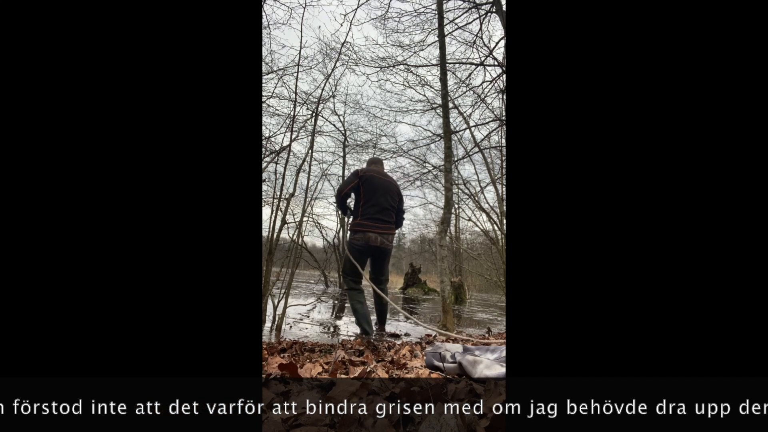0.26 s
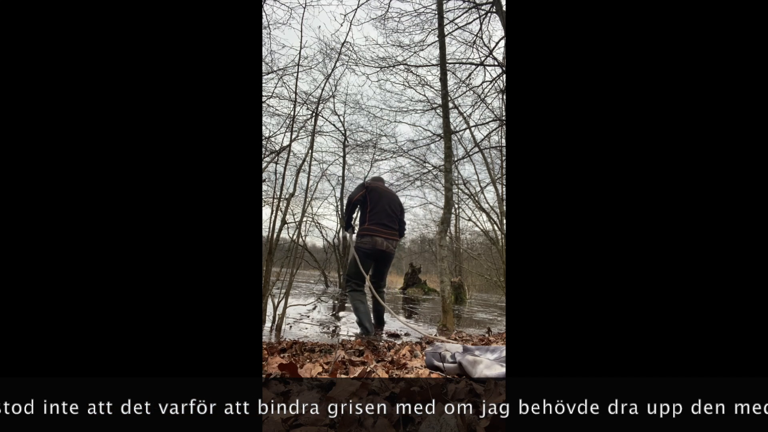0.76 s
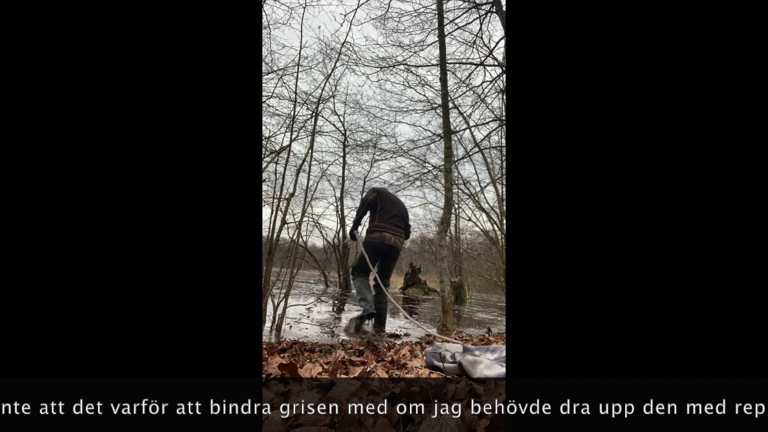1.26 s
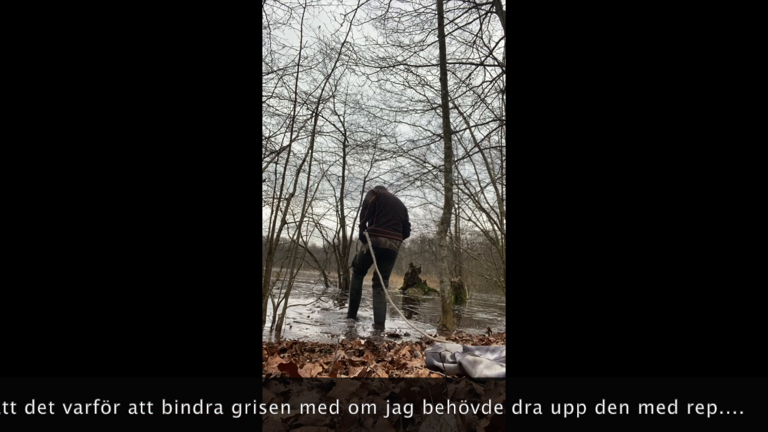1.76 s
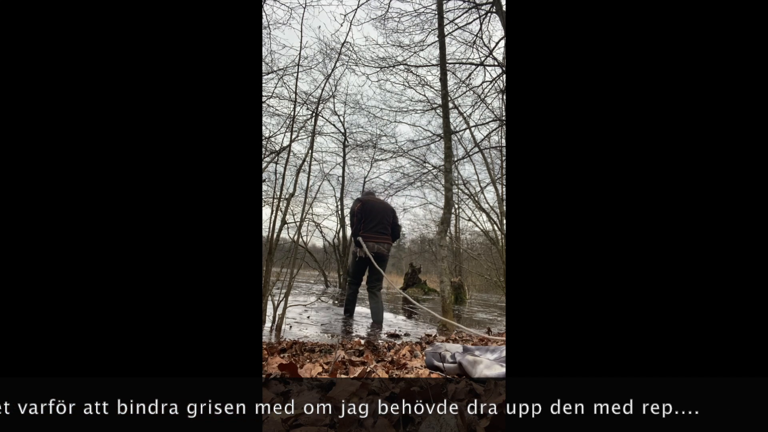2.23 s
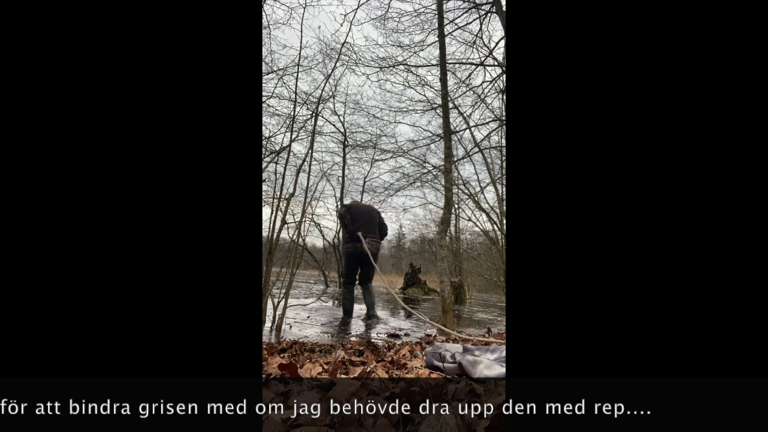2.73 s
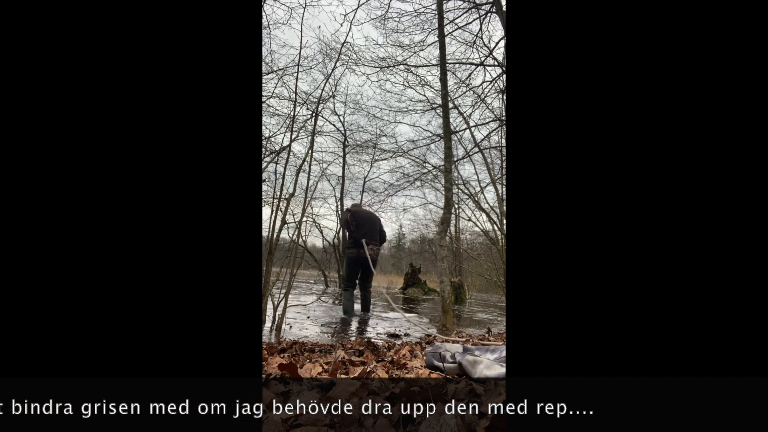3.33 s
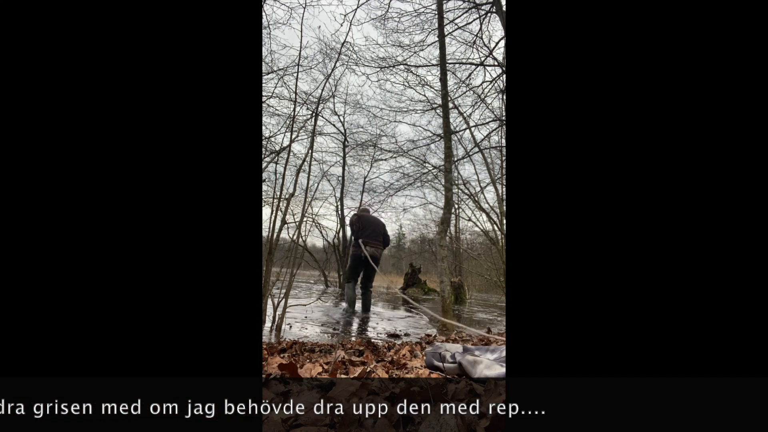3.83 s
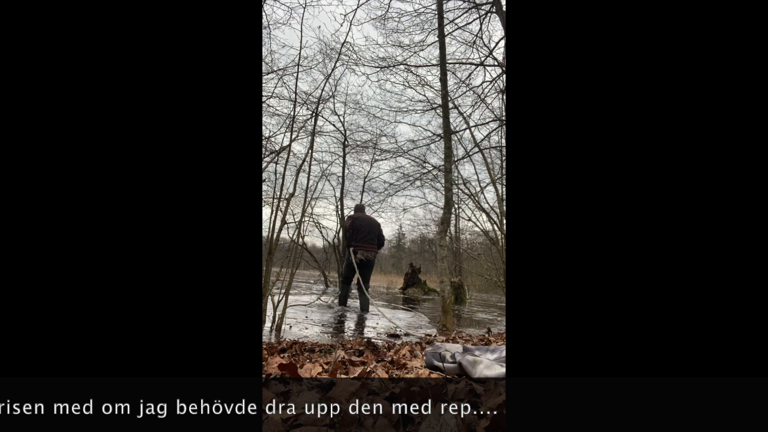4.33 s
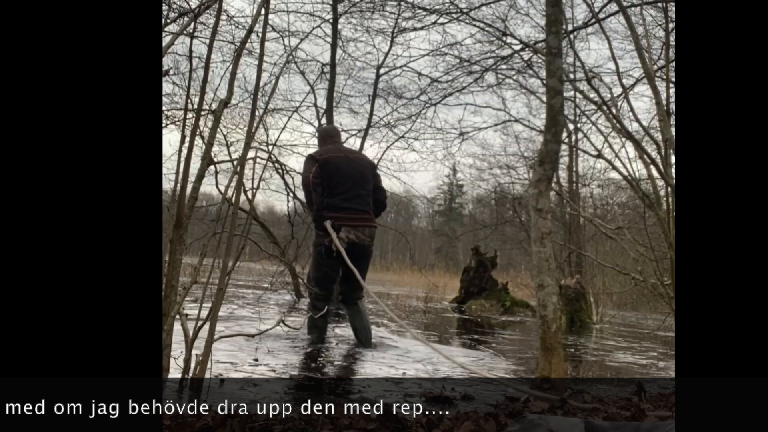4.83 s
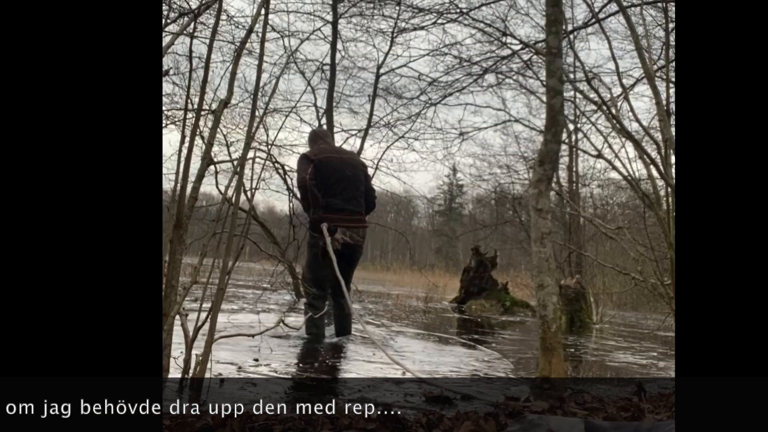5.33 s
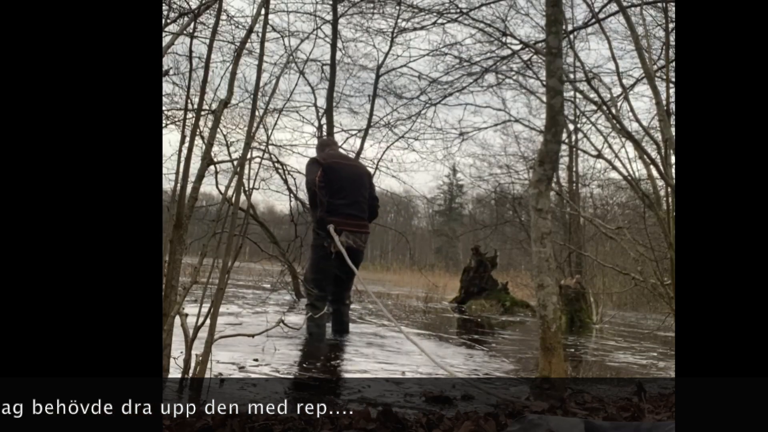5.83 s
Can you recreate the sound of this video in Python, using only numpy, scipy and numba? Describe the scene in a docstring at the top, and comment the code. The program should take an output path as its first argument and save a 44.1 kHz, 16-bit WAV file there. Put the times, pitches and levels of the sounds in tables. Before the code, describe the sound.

Someone wades into a shallow woodland pool, close to the microphone at first. In the first second there are a few small splashes and soft brushes of dry leaves, and a small bird gives two faint, thin, high whistles. From about 1.3 seconds the legs push hard through the water: sharp splashes, round gurgling bubbles, low boot thumps and drops falling back, loudest between 1.4 and 1.8 seconds. After a short lull the bird calls once more at about 2.4 seconds, and a second surge of splashing follows around 2.7 to 3 seconds. The wader then moves away, with softer sloshing steps at about 4 to 4.5 seconds and again from 5 seconds, thinning to light splashes and drips by 6 seconds. Far traffic rumbles quietly throughout with a low, wavering hum, and the trees add only a very short echo.

```python
"""Dry leaves rustle and a small bird whistles twice as someone steps into a shallow woodland pool.
From 1.3 s the legs push hard: trapped air rings as bubbles, boots thump, sheets of water break into
spray and drops fall back. The bird calls again at 2.4 s, just before a second surge, and then the
splashes soften as the wader moves away. Far traffic rumbles throughout with a low, wavering hum."""
import sys
import numpy as np
from scipy import signal
from scipy.fft import rfft, irfft, next_fast_len
from scipy.io import wavfile
from scipy.ndimage import uniform_filter1d
from numba import njit

SR = 44100
rng = np.random.default_rng(int(sys.argv[2]) if len(sys.argv) > 2 else 0)


def pcm_store(signal):
    """Save signal as 16-bit PCM."""
    levels = np.round(np.clip(np.atleast_2d(signal), -1, 1) * 32767)
    wavfile.write(sys.argv[1], SR, levels.astype(np.int16).T)


N = 268567


def undb(db):
    return 10 ** (np.asarray(db) / 20)


def unit_rms(x):
    return x / np.sqrt(np.mean(x ** 2))


def over_time(table):
    """Columns of an envelope table at every sample."""
    times, *columns = np.transpose(table)
    return [np.interp(np.arange(N) / SR, times, column) for column in columns]


def over_pitch(points, size):
    """Values of (Hz, value) points at the bins of an FFT."""
    hz, value = np.transpose(points)
    return np.interp(np.log(np.arange(size // 2 + 1) * SR / size + 20), np.log(hz + 20), value)


def colour(x, eq):
    """Filter by a (Hz, dB) curve."""
    size = next_fast_len(x.shape[-1])
    return irfft(rfft(x, size) * undb(over_pitch(eq, size)), size)[..., :x.shape[-1]]


def noise(eq):
    return unit_rms(colour(rng.standard_normal(N), eq))


def wander(rate_hz):
    """Smooth random modulation with a spread near 1."""
    hold = int(SR / rate_hz)
    steps = np.repeat(rng.standard_normal(N // hold + 1), hold)
    return 1.3 * uniform_filter1d(uniform_filter1d(steps, hold), hold)[:N]


@njit
def bubbles(length, start, hz, t60, rise, size, swell_cycles):
    """Damped sines whose pitch rises as they fade, as bubbles near a surface do."""
    out = np.zeros(length)
    for k in range(len(start)):
        n = int(t60[k] * SR) + 2
        decay, step = np.exp(-6.9 / n), 2 * np.pi * hz[k] / SR
        gain, phase = size[k], 0.
        for i in range(min(n, length - start[k])):
            phase += step * (1 + rise * i / n)
            gain *= decay
            attack = 1 - np.exp(-phase / (2 * np.pi * swell_cycles))
            out[start[k] + i] += gain * np.sin(phase) * attack
    return out


def clusters(events, count, stagger, ring, cycles, rise, swell_cycles, neighbours=1):
    """A lead bubble and its neighbours per event; stagger and ring scale its length, cycles caps ring."""
    out, span = np.zeros(N), int(.25 * SR)
    for start_s, db, hz, length_s, octaves, attack_s in events:
        lag, detune = rng.gamma(1.5, size=count), rng.standard_normal(count)
        lag[0] = detune[0] = 0
        starts = np.clip(lag * stagger * length_s * SR, 0, span - 1).astype(int)
        pitches = np.clip(hz * 2 ** (octaves * detune), 90, 15500)
        t60 = np.minimum(cycles / pitches, ring * length_s)
        sizes = np.exp(-.45 * lag) * np.where(lag > 0, neighbours, 1)
        cluster = bubbles(span, starts, pitches, t60, rise, sizes, swell_cycles)
        cluster *= 1 - np.exp(-np.arange(span) / SR / attack_s)
        i = int(start_s * SR)
        out[i:i + span] += (cluster * undb(db) / np.abs(cluster).max())[:N - i]
    return out


def swarm(count, lo_hz, hi_hz, cycles, scatter_db):
    """Bubbles at random moments and pitches; a few are much louder than the rest."""
    when, pitch, luck, life = rng.random((count, 4)).T
    hz = lo_hz * (hi_hz / lo_hz) ** pitch
    sizes = undb(np.minimum(-scatter_db * np.log(1 - luck), 4 * scatter_db))
    t60 = cycles * (.5 + life) / hz
    return unit_rms(bubbles(N, (when * N).astype(int), hz, t60, rise=0.23, size=sizes, swell_cycles=2.2))


def churn(lo_hz, hi_hz, flicker_db, rate_hz):
    """Turbulent hiss in third octaves, each flickering partly on its own."""
    out, shared = 0, wander(rate_hz)
    for hz in lo_hz * 2 ** np.arange(0, np.log2(hi_hz / lo_hz), 1 / 3):
        band_eq = [(hz * .75, -40), (hz * .89, 0), (hz * 1.12, 0), (hz * 1.33, -40)]
        band = colour(rng.standard_normal(N), band_eq)
        out = out + band * undb(flicker_db * (1.61 * shared + 0.51 * wander(rate_hz)))
    return unit_rms(out)


# The push of the legs. Each row: time in seconds, then slosh, wash and spray levels in dB.
LEG_PUSH = [(0.0, -76, -61, -65), (0.1, -68, -73, -68), (0.27, -86, -78, -70), (0.33, -86, -86, -75.5),
            (1.08, -79.5, -90, -74.5), (1.15, -63, -62, -61), (1.33, -52, -57.5, -51.5),
            (1.41, -54, -51, -52), (1.45, -39, -48, -53), (1.505, -45.5, -47.5, -48.5),
            (1.55, -44, -43.5, -49), (1.61, -49, -49, -51), (1.69, -47, -44.5, -50.5),
            (1.75, -52, -51, -47.5), (1.97, -57, -67, -59.5), (2.15, -58.5, -61, -59),
            (2.3, -65.5, -74.5, -58.5), (2.6, -59, -66, -59), (2.7, -57.5, -62, -54),
            (2.92, -49, -52, -48.5), (3.36, -57, -63.5, -60.5), (3.5, -71, -75.5, -62),
            (3.86, -61.5, -70, -59.5), (4.12, -58.5, -58, -56), (4.42, -59, -62, -58),
            (4.5, -51, -60, -58.5), (4.68, -68.5, -69, -64.5), (4.9, -64.5, -68.5, -59),
            (5.0, -67, -70, -57.5), (5.03, -61.5, -66, -56.5), (5.2, -58.5, -61.5, -57.5),
            (5.55, -62.5, -67.5, -60.5), (5.72, -65.5, -71, -63.5), (5.95, -73, -74.5, -65),
            (6.09, -69, -86, -63)]
# The level of the 2.5-5 kHz fizz, swelling with each surge and sinking in the lulls.
# Each row: time in seconds, level in dB.
FIZZ_ENVELOPE = [(0.0, -69), (0.34, -81.5), (0.88, -86.5), (1.08, -80), (1.31, -57.5), (1.47, -65),
                 (1.59, -58.5), (1.68, -53), (1.9, -64), (2.27, -73), (2.56, -72), (2.68, -63), (2.81, -58),
                 (2.95, -57.5), (3.53, -70), (3.81, -69), (4.16, -60.5), (4.34, -62), (4.61, -68.5),
                 (4.92, -68), (5.26, -63), (6.09, -72)]
# The tone of the four water layers. Each row: frequency in Hz, gain in dB.
SLOSH_EQ = [(120, -5.5), (250, -6), (500, -1.5), (800, -8), (1300, -26.5)]
WASH_EQ = [(600, -36), (1000, -3), (1800, 1), (2600, -1.5), (4000, -7)]
SPRAY_EQ = [(3200, -12), (4300, -8.5), (5200, 0), (6000, 4), (7800, 1), (9500, -2), (12000, -5), (15500, 2)]
FIZZ_EQ = [(2200, 0.5), (2800, -8), (3400, -5), (4200, -2), (5000, 0), (6000, -32)]

def wading():
    """Legs stir up bubbles, from large in the slosh to tiny in the spray, each over a churning hiss."""
    slosh_db, wash_db, spray_db = over_time(LEG_PUSH)
    fizz_db, = over_time(FIZZ_ENVELOPE)
    slosh = swarm(count=2200, lo_hz=153.5, hi_hz=1095, cycles=13.5, scatter_db=2.5)
    slosh += churn(117.7, 1300, flicker_db=3.5, rate_hz=20)
    wash = swarm(count=2500, lo_hz=807, hi_hz=3506, cycles=28.5, scatter_db=3)
    wash += 0.9 * churn(609, 4000, flicker_db=2.5, rate_hz=25)
    spray = swarm(count=14000, lo_hz=4410, hi_hz=16030, cycles=52, scatter_db=5)
    spray += 1.3 * churn(3290, 16000, flicker_db=1.55, rate_hz=40)
    fizz = swarm(count=5000, lo_hz=2484, hi_hz=5440, cycles=34, scatter_db=4)
    fizz += 0.81 * churn(2340, 6000, flicker_db=1.4, rate_hz=32)
    layers = [(slosh, slosh_db, SLOSH_EQ), (wash, wash_db, WASH_EQ),
              (spray, spray_db, SPRAY_EQ), (fizz, fizz_db, FIZZ_EQ)]
    return sum(undb(db) * unit_rms(colour(layer, eq)) for layer, db, eq in layers)


# Low footfalls. Each row: start in seconds, level in dB, pitch in Hz.
BOOT_THUMPS = [(1.434, -33, 220), (1.686, -39, 267), (2.945, -43, 256), (4.299, -44, 262)]

def boots():
    """Boots hit the water and the soft bottom with a short, low ring."""
    length_s, octaves, attack_s = 0.0182, 0.16, 0.00026
    events = [(*row, length_s, octaves, attack_s) for row in BOOT_THUMPS]
    return clusters(events, count=4, stagger=0.374, ring=4.5, cycles=6.4, rise=0.089, swell_cycles=0.25)


# Round glugs. Each row: start in seconds, level in dB, pitch in Hz, ring time in seconds.
GLUGS = [(0.147, -55.5, 1200, 0.023), (0.018, -57, 575, 0.032), (0.64, -63.5, 600, 0.075),
         (0.7921, -60, 915, 0.031), (0.798, -53.5, 376, 0.074), (1.1425, -49.5, 336, 0.048),
         (1.188, -49, 530, .05), (1.205, -50, 370, 0.052), (1.251, -43.5, 947, 0.036),
         (1.2744, -38.5, 705, 0.042), (1.2756, -29, 446, .03), (1.3189, -44, 840, 0.027),
         (1.337, -40, 613, 0.066), (1.339, -40, 397, 0.066), (1.372, -42, 433, 0.04),
         (1.397, -47, 435, 0.045), (1.427, -28.5, 477, 0.029), (1.4297, -33, 770, .055),
         (1.437, -30.5, 502, 0.057), (1.468, -27, 541, 0.0472), (1.475, -36.5, 977, 0.039),
         (1.521, -35, 822, .05), (1.524, -34, 1063, .04), (1.548, -37.5, 896, 0.072),
         (1.575, -47.5, 634, 0.0766), (1.6774, -32, 914, 0.045), (1.678, -36, 630, 0.043),
         (1.679, -36, 415, 0.065), (1.725, -40.5, 1010, .06), (1.816, -47, 447, 0.047),
         (1.852, -40, 327, 0.033), (1.862, -47, 800, .07), (1.925, -51.5, 709, 0.0593),
         (2.612, -50.5, 570, .05), (2.6554, -51, 355, 0.062), (2.706, -52, 815, .09),
         (2.7397, -45, 356, 0.085), (2.798, -39, 583, 0.11), (2.834, -38, 323, 0.018),
         (2.871, -47, 610, .05), (2.975, -48, 644, 0.077), (3.101, -46, 363, .06), (3.3319, -44, 366, .06),
         (3.982, -50, 955, 0.033), (3.9867, -37.5, 443, 0.068), (4.0311, -50, 583, 0.037),
         (4.116, -50, 1030, 0.024), (4.1564, -47, 464, .05), (4.197, -44.5, 484, 0.047),
         (4.405, -40.5, 309, 0.04), (4.4459, -41, 418, 0.047), (4.8702, -46.5, 1180, 0.017),
         (5.0179, -52, 895, 0.014), (5.0281, -48.5, 306, .06), (5.028, -48.5, 663, 0.045),
         (5.205, -52, 690, 0.039), (5.118, -56, 1020, .03), (5.258, -52.5, 664, .06),
         (5.334, -43.5, 344, 0.045), (5.3606, -48, 390, 0.051), (5.678, -48, 1080, 0.016)]

def air_pockets():
    """Big pockets of trapped air ring as pairs of bubbles."""
    octaves, attack_share = 0.075, 0.073
    events = [(*row, octaves, attack_share * row[3]) for row in GLUGS]
    return clusters(events, count=2, stagger=0.12, ring=1, cycles=80, rise=0.097, swell_cycles=0.5,
                    neighbours=0.76)


# Small plinks. Each row: start in seconds, level in dB, pitch in Hz.
PLINKS = [(0.0196, -52, 1500), (0.065, -48.5, 1650), (0.154, -50, 1730), (0.26, -66, 1470),
          (0.565, -66, 1280), (0.652, -66, 1700), (1.117, -47, 2180), (1.3, -40.5, 1910),
          (1.4517, -34, 1770), (1.52, -31.5, 1323), (1.636, -32.5, 1660), (1.6793, -29.5, 1640),
          (1.816, -46.5, 1710), (1.897, -57, 2160), (2.106, -47, 1770), (2.786, -38.5, 1400),
          (2.836, -40.5, 1790), (2.872, -36.5, 1620), (2.934, -37.5, 1600), (3.193, -50, 1340),
          (3.929, -45.5, 2020), (4.053, -43.5, 1270), (4.236, -43.5, 1214), (4.292, -43, 1570),
          (4.398, -49, 1490), (4.537, -50, 1790), (5.047, -50.5, 1450), (5.0752, -49, 1880),
          (5.121, -47.5, 1320), (5.684, -49, 2280)]

def drops():
    """Drops fall back into the pool, each ringing a handful of small bubbles."""
    length_s, octaves, attack_s = 0.009, 0.25, 0.00026
    events = [(*row, length_s, octaves, attack_s) for row in PLINKS]
    return clusters(events, count=7, stagger=0.49, ring=3.7, cycles=28.6, rise=0.1, swell_cycles=0.12)


# Bright splash hits. Each row: start in seconds, level in dB, centre pitch in Hz, length in seconds,
# pitch spread in octaves, attack in seconds.
WATER_SLAPS = [(0.013, -37.5, 5800, 0.0049, 0.58, .0005), (0.148, -40, 6270, 0.007, 0.35, 0.00055),
               (0.219, -51.5, 4520, 0.003, 0.22, 0.00055), (0.259, -61, 4460, 0.0066, 0.2, .001),
               (0.404, -49.5, 6800, .005, 0.14, .0003), (0.466, -55, 6150, 0.0041, 0.16, .0005),
               (0.562, -57, 9100, .002, 0.31, 0.00044), (1.118, -43, 8600, 0.0043, 0.22, .0005),
               (1.128, -45, 6560, 0.0022, 0.15, 0.00046), (1.138, -37, 8550, 0.0017, 0.33, .0003),
               (1.185, -46, 5500, 0.0034, 0.45, .001), (1.288, -34.5, 8200, 0.0057, 0.33, 0.00042),
               (1.3163, -28.5, 8400, 0.0054, 0.22, .0003), (1.4255, -20.5, 6940, 0.0022, 0.65, 0.00018),
               (1.436, -28, 5630, 0.0046, 0.62, 0.0011), (1.451, -32, 3450, 0.0042, 0.068, 0.0014),
               (1.468, -34, 7860, 0.0033, 0.36, .0005), (1.496, -35, 4000, 0.0041, 0.47, .0005),
               (1.521, -27.5, 5030, 0.0039, 0.47, 0.00039), (1.57, -32, 7100, 0.0031, 0.83, .0005),
               (1.625, -29.5, 4970, 0.004, 0.11, 0.00033), (1.633, -26.5, 4400, 0.0084, 0.18, 0.0028),
               (1.6787, -15.5, 5530, 0.0059, 0.77, 0.00064), (1.7466, -31, 5000, 0.0087, 0.44, 0.00058),
               (1.802, -50, 6500, 0.0038, 0.22, .0005), (1.864, -35.5, 7400, 0.0037, 0.56, 0.00079),
               (1.9, -31.5, 3020, 0.0048, 0.27, 0.00037), (1.909, -29.5, 7260, 0.002, 0.35, 0.00024),
               (1.92, -34, 6300, 0.0029, 0.3, .0005), (1.977, -44, 4930, 0.0032, 0.11, .0005),
               (2.017, -60, 3680, 0.006, 0.096, .001), (2.055, -45, 7100, 0.0024, 0.16, 0.00054),
               (2.089, -41, 6600, 0.0053, 0.42, .001), (2.1772, -32, 6100, 0.0031, 0.17, 0.00022),
               (2.243, -56, 5860, 0.0042, .1, .001), (2.334, -42, 6200, 0.0072, 0.17, 0.0019),
               (2.36, -40.5, 5960, 0.0042, .08, 0.0011), (2.453, -40, 8000, 0.0025, 0.1, 0.0012),
               (2.557, -46, 5680, 0.0054, 0.074, .001), (2.611, -42.5, 7200, 0.0059, 0.45, .0005),
               (2.628, -52, 3760, 0.00094, 0.26, .0005), (2.6606, -39.5, 6540, 0.0067, 0.59, .0005),
               (2.756, -28.5, 6720, 0.011, 0.37, 0.0043), (2.83, -33.5, 5900, .012, 0.44, 0.0018),
               (2.873, -43, 4270, 0.0094, 0.33, .002), (2.88, -29, 6550, 0.0065, 0.32, 0.0012),
               (2.927, -23.5, 7000, 0.0096, 0.39, 0.0025), (2.985, -33, 6750, 0.008, 0.13, 0.00089),
               (3.2436, -35.5, 7340, 0.004, 0.65, .0005), (3.308, -40.5, 7100, .003, 0.14, .001),
               (3.355, -41.5, 6000, .003, .2, 0.001), (3.446, -43, 5700, 0.0053, 0.088, .0005),
               (3.548, -36.5, 5860, 0.0031, 0.12, .0003), (3.844, -43, 7040, 0.0029, .1, 0.00033),
               (4.161, -43.5, 3640, 0.0052, 0.082, .002), (4.154, -42, 6400, .005, .1, .001),
               (4.223, -41.5, 4200, 0.0077, 0.26, 0.0026), (4.244, -42, 4000, 0.011, .2, .002),
               (4.26, -38.5, 4100, .012, 0.19, 0.0025), (4.383, -40, 4330, 0.0062, 0.17, 0.0011),
               (4.451, -41, 3900, 0.0047, 0.068, 0.0018), (4.466, -38.5, 3850, 0.003, 0.072, 0.00077),
               (4.6149, -40, 7000, 0.0019, 0.21, .0005), (5.02, -41.5, 1970, 0.0031, 0.91, 0.00045),
               (5.118, -44.5, 3900, 0.0062, 0.091, 0.0015), (5.127, -47, 2850, 0.0048, 0.33, 0.00091),
               (5.181, -43, 5130, 0.0046, 0.23, 0.00043), (5.215, -49, 2370, .004, 0.35, .001),
               (5.263, -44, 6750, 0.0061, .15, .002), (5.359, -47, 4400, 0.0048, 0.54, 0.00057),
               (5.388, -42.5, 3780, .0031, 0.16, .0005), (5.483, -42.5, 3790, 0.0076, 0.33, 0.0016),
               (5.512, -41, 5800, 0.004, 0.052, 0.0018), (5.517, -48, 3350, 0.0033, 0.11, .001),
               (5.627, -40.5, 6150, 0.0055, 0.12, 0.00054), (5.681, -42.5, 5500, 0.011, 0.31, 0.0032),
               (5.718, -38, 5630, 0.013, 0.1, 0.0083), (5.75, -44, 5220, 0.0031, 0.046, .001),
               (5.9, -40.5, 5370, 0.0065, 0.15, 0.0003), (6.01, -47.5, 6040, 0.017, 0.14, .002)]
# The tone of the crack under each hit. Each row: frequency in Hz, gain in dB.
CRACK_EQ = [(80, -29), (200, 15.5), (500, -0.5), (1500, -3), (3000, -16), (6500, 8.5), (9000, -2),
            (12000, -19.5), (15500, -10)]

def slaps():
    """Slaps of water shatter into many tiny bubbles over a broad crack."""
    spray = clusters(WATER_SLAPS, count=50, stagger=.65, ring=1.01, cycles=16, rise=0.27,
                     swell_cycles=0.16)
    envelope, t = np.zeros(N), np.arange(int(.15 * SR)) / SR
    for start_s, db, _, length_s, _, attack_s in WATER_SLAPS:
        strength = undb(1.2 * (db + 23) - 35)  # harder slaps crack disproportionately louder
        decay = np.exp(-t / (0.00098 + 1.98 * length_s))
        attack = 1 - np.exp(-t / attack_s)
        i = int(start_s * SR)
        envelope[i:i + len(t)] += (strength * decay * attack)[:N - i]
    return spray + envelope * undb(3.1 * wander(300)) * noise(CRACK_EQ)


# Soft leaf brushes. Each row: peak time in seconds, level in dB, rise and fade in seconds.
LEAF_BRUSHES = [(0.059, -54.5, 0.0051, 0.0088), (0.247, -71, 0.047, 0.032), (0.71, -65.5, 0.014, 0.064),
                (.842, -65.5, 0.009, 0.047), (0.945, -67, 0.011, 0.018), (1.052, -57.5, 0.016, 0.062)]
# Their crisp tone. Each row: frequency in Hz, gain in dB.
LEAF_EQ = [(3000, -16.5), (4800, -6), (6200, 4), (7500, 1), (8500, -8), (10000, -10.5)]

def leaves():
    """Rope or cloth brushes through dry leaves in short swells of crackle."""
    t = np.arange(N) / SR
    swells = sum(undb(db) * np.exp(-((t - peak_s) / np.where(t < peak_s, rise_s, fade_s)) ** 2)
                 for peak_s, db, rise_s, fade_s in LEAF_BRUSHES)
    return swells * undb(2.2 * wander(97)) * noise(LEAF_EQ)


# Three whistles, one list apiece. Each row: time in seconds, pitch in Hz, level in dB.
WHISTLES = [
    [(0.14, 6900, -68), (0.22, 6930, -59), (0.29, 6740, -65), (0.36, 6760, -78)],
    [(0.43, 6850, -78), (0.465, 6800, -67), (0.53, 6630, -61), (0.59, 6700, -83)],
    [(2.39, 6600, -71), (2.43, 7440, -60), (2.448, 7620, -47), (2.468, 8200, -57), (2.487, 7340, -55),
     (2.525, 6150, -55)],
]
# The waver of each whistle, as a share of its pitch.
WHISTLE_WAVER = [.004, .004, .032]

def bird():
    """A small bird whistles thinly; fast flutter in level and pitch makes it slightly hoarse."""
    out, t = np.zeros(N), np.arange(N) / SR
    for call, waver in zip(WHISTLES, WHISTLE_WAVER):
        hz, db = over_time(call)
        gate = np.clip(np.minimum(t - call[0][0], call[-1][0] - t) / 0.005, 0, 1)
        level = gate * undb(db + 4 * wander(90))
        pitch = hz * (1 + waver * wander(300))
        out += level * np.sin(2 * np.pi * np.cumsum(pitch) / SR)
    return out


# The traffic bed. Each row: time in seconds, rumble level in dB, hum pitch in Hz, hum level in dB.
TRAFFIC_BED = [(0.0, -56.5, 139.8, -78), (1.2, -58.5, 137.2, -62.5), (1.49, -58.5, 132.9, -56.5),
               (2.02, -54.5, 136.5, -61.5), (3.99, -53.5, 133.2, -56), (4.73, -57.5, 138.2, -68.5),
               (5.04, -51.5, 129.2, -54), (5.53, -58.5, 128.4, -65.5), (6.09, -53, 127.2, -62)]
# The dark tone of the rumble. Each row: frequency in Hz, gain in dB.
RUMBLE_EQ = [(15, -16), (25, -12), (60, 1.5), (91, -1), (230, -9), (315, -15.5), (425, -25.5), (775, -85),
             (900, -80), (1170, -91), (1980, -120)]

def traffic():
    """Far traffic rumbles under a low, wavering hum."""
    rumble_db, hum_hz, hum_db = over_time(TRAFFIC_BED)
    rumble = undb(rumble_db + 0.8 * wander(4.3)) * noise(RUMBLE_EQ)
    hum_level = undb(hum_db + 5.2 * wander(25))
    hum_pitch = hum_hz * (1 + 0.0276 * wander(16))
    return rumble + hum_level * np.sin(2 * np.pi * np.cumsum(hum_pitch) / SR)


# The tone of the open air. Each row: frequency in Hz, gain in dB.
AIR_EQ = [(400, -1), (1000, -46), (2500, -44), (4500, -23), (6300, 18), (8000, -5), (11000, -36),
          (15500, 9.5)]

def air():
    """A faint, high hiss that drifts in level."""
    return undb(-73 + 2 * wander(9.6)) * noise(AIR_EQ)


# The tone of the woodland reverb. Each row: frequency in Hz, gain in dB.
SCATTER_EQ = [(60, -40), (250, -18), (700, -3.5), (2300, -7.5), (2830, -2.5), (3300, -6), (4500, -5),
              (6500, -21.5), (8500, -45), (10500, 1.5), (12500, -7.5), (13500, -29)]

def woodland_scatter(direct, t60_s=0.18):
    """Trunks and water scatter a short tail, different for each side."""
    t = np.arange(6000) / SR
    tail = rng.standard_normal((2, len(t))) * undb(-60 * t / t60_s)
    tail /= np.linalg.norm(tail[0])
    return signal.fftconvolve(colour(direct, SCATTER_EQ)[None], tail, axes=1)[:, :N]


# Stereo balance. Each row: frequency in Hz, left minus right in dB.
STEREO_BALANCE = [(100, 0), (250, -.7), (400, -2.6), (650, -8), (900, -4), (1250, .5), (2100, .5),
                  (2500, 5), (2900, 4), (3300, 0), (4600, -2.5), (5200, 0)]
# Stereo phase. Each row: frequency in Hz, lead of the left side in half turns.
STEREO_PHASE = [(20, -.01), (150, -.02), (520, -.08), (750, .2), (1000, .38), (2000, .12), (2400, .65),
                (2750, .75), (3100, 1.9), (3600, 2.17), (4300, 2), (4800, 2.3), (5300, 2), (9600, 1.95),
                (11000, 1.65), (12400, 1.28), (13200, 1), (16000, 1)]

def microphone_ports(direct):
    """Two microphone ports hear the direct sound, each with its own gain and phase."""
    size = next_fast_len(N)
    left = undb(over_pitch(STEREO_BALANCE, size) / 2) * np.exp(.5j * np.pi * over_pitch(STEREO_PHASE, size))
    return irfft(rfft(direct, size) * np.array([left, 1 / left]), size)[:, :N]


# The overall tone, with a dip at 2.2 kHz and slightly softer highs. Each row: frequency in Hz, gain in dB.
MIX_EQ = [(1800, 0), (2200, -3), (2500, 0.5), (2830, 1), (3200, -0.5), (3900, 0), (4800, -2.5)]

def scene():
    """The water in front, leaves, bird and traffic around it, all in a short woodland reverb."""
    water = wading() + boots() + air_pockets() + drops() + slaps()
    direct = colour(water + leaves() + bird() + traffic() + air(), MIX_EQ)
    return microphone_ports(direct) + woodland_scatter(direct)


def record(dry):
    """The level dips briefly once; the microphone drops the deepest bass and the top is cut."""
    dip_at_s, dip_width_s, dip_db = 4.435, 0.0035, -14
    dip = undb(dip_db * np.exp(-((np.arange(N) / SR - dip_at_s) / dip_width_s) ** 2))
    low_cut = signal.butter(3, 49, "high", fs=SR, output="sos")
    high_cut = signal.ellip(10, .2, 60, 15900, fs=SR, output="sos")
    return signal.sosfilt(high_cut, signal.sosfilt(low_cut, dry * dip))


dry = scene()
out = record(dry)
pcm_store(out)
```